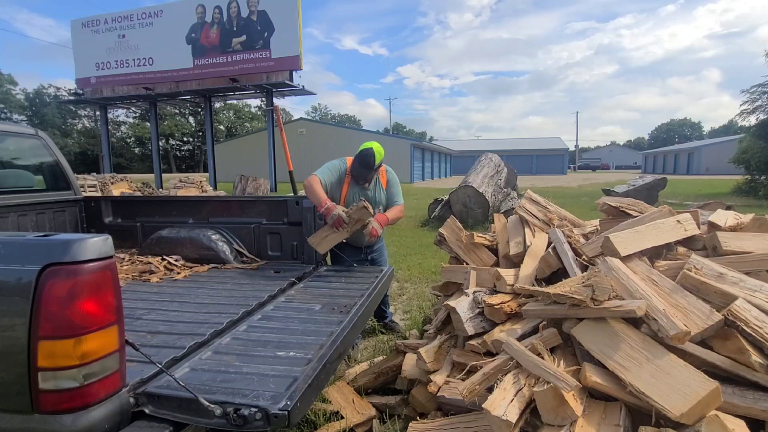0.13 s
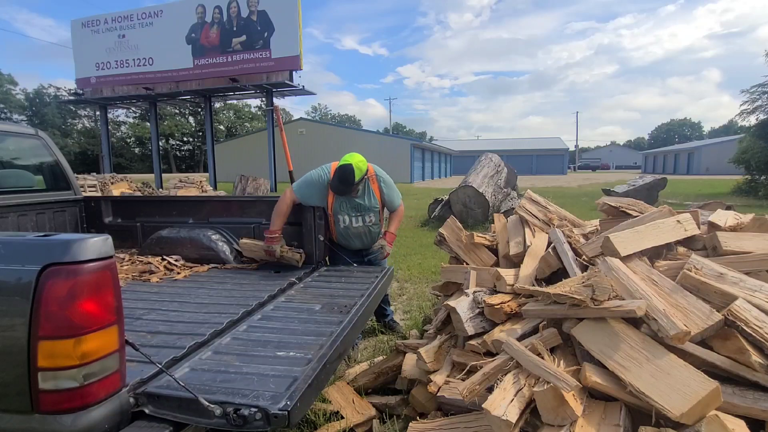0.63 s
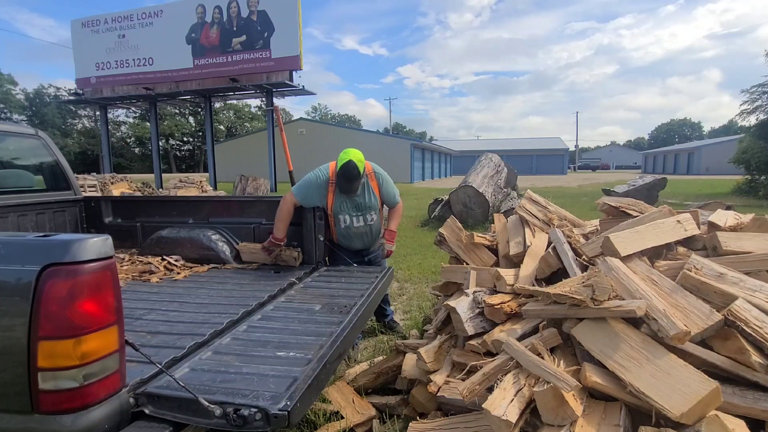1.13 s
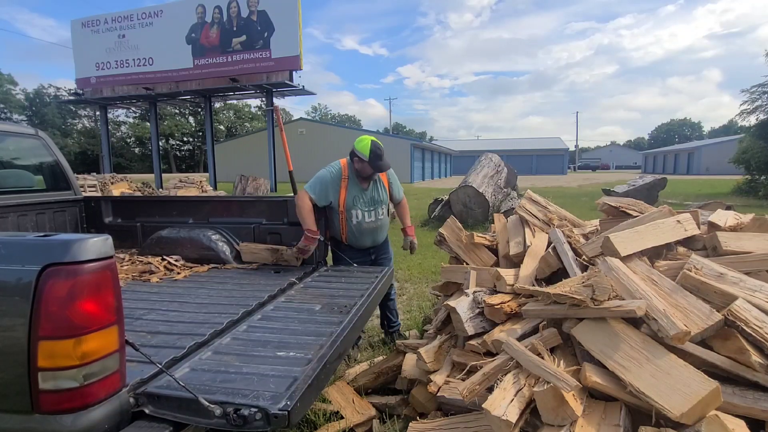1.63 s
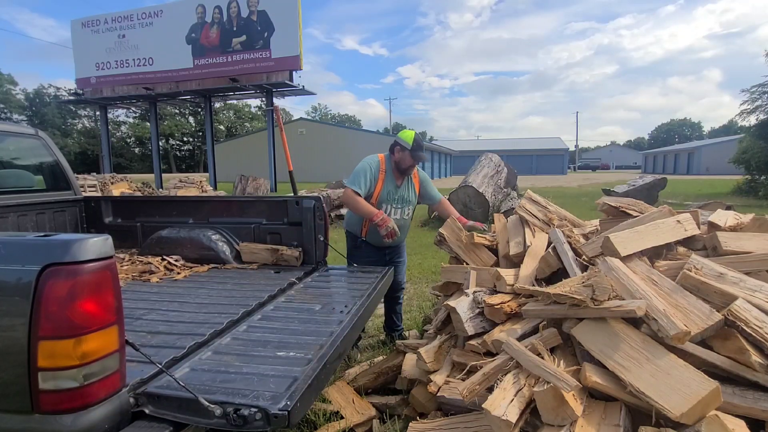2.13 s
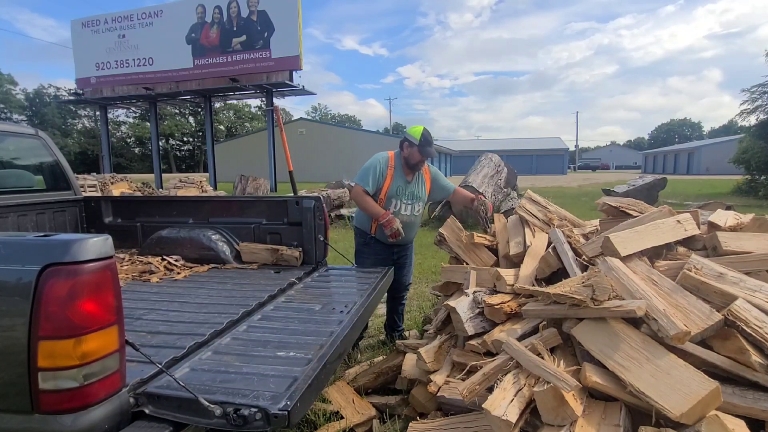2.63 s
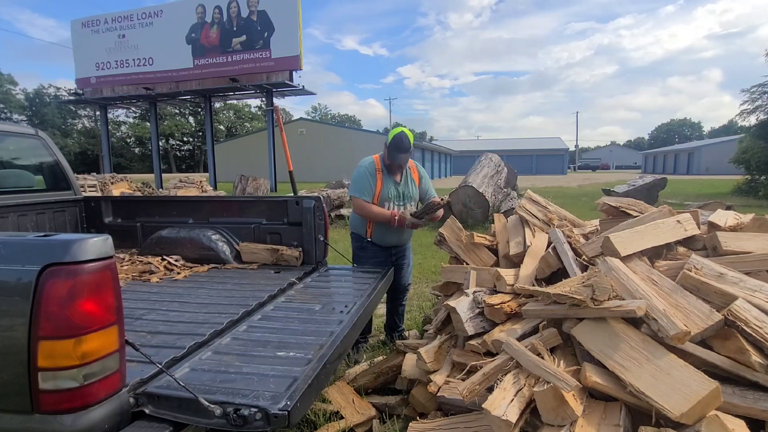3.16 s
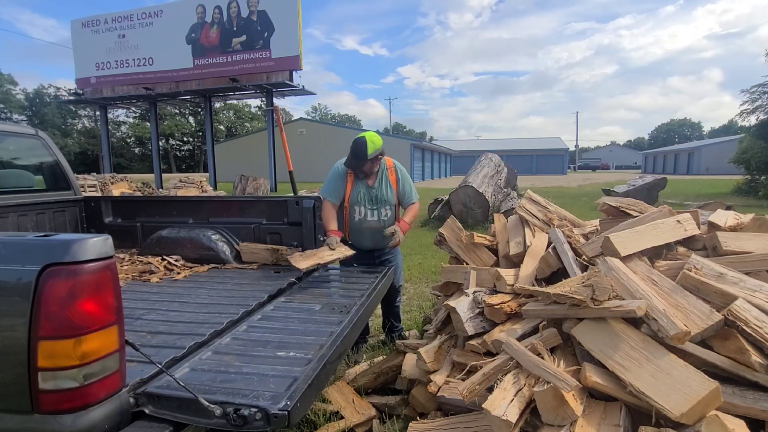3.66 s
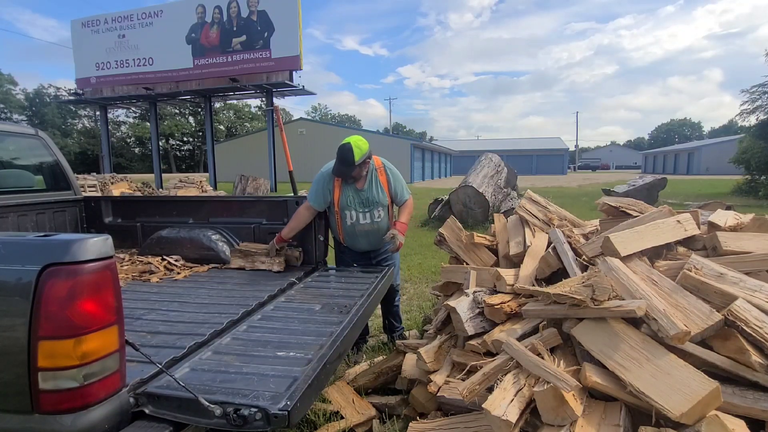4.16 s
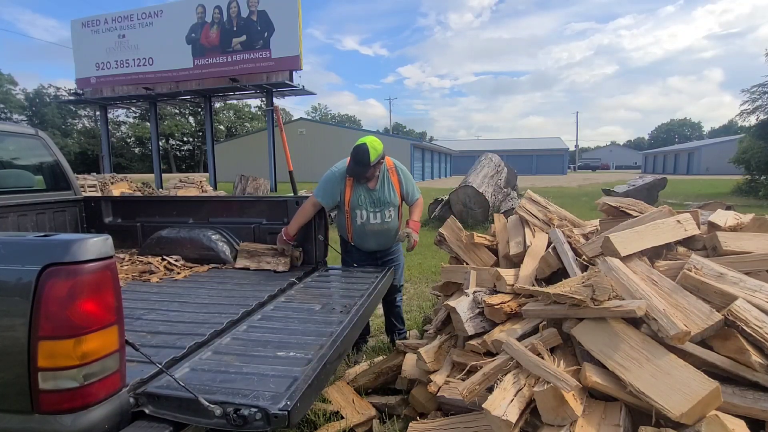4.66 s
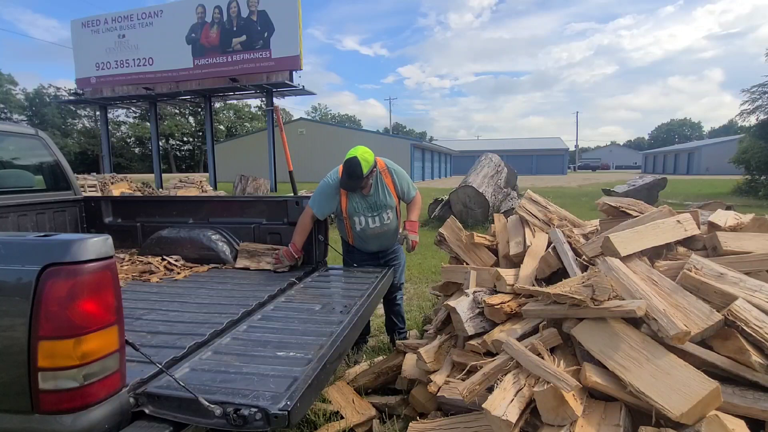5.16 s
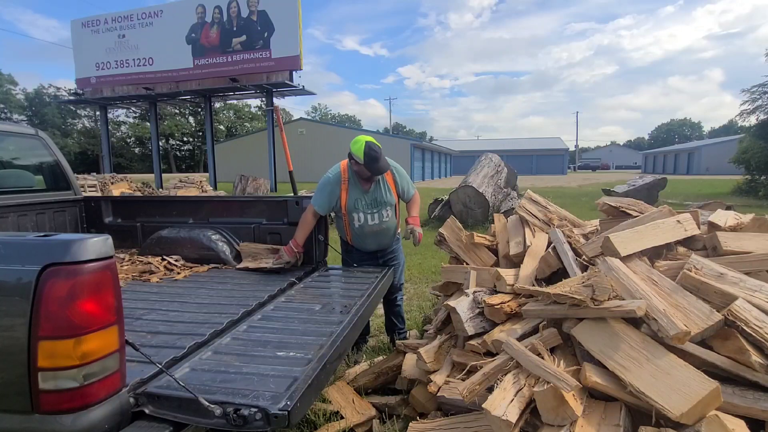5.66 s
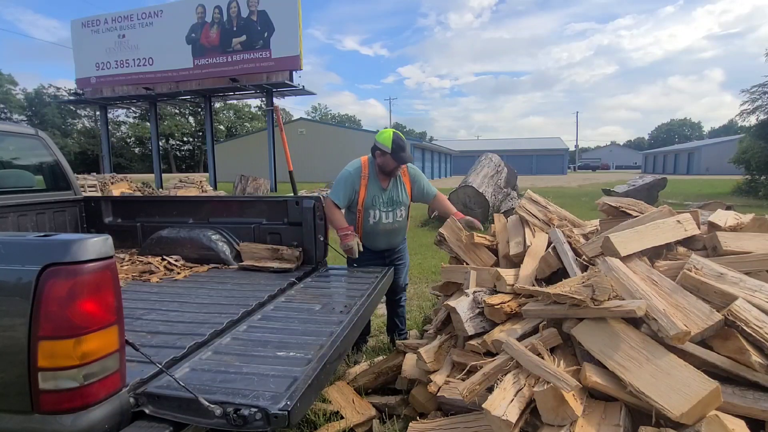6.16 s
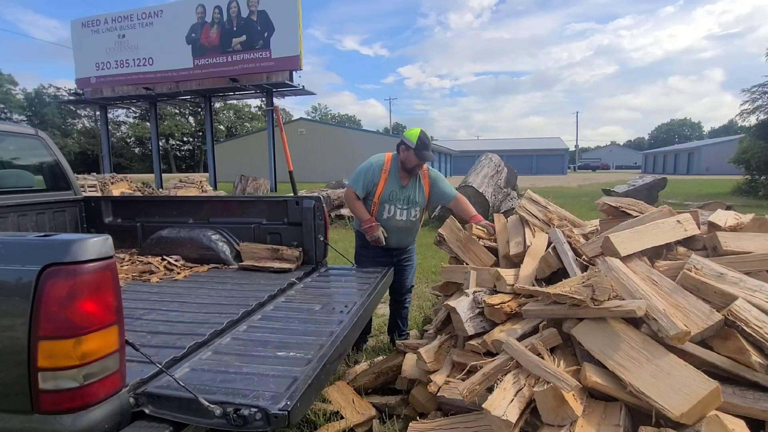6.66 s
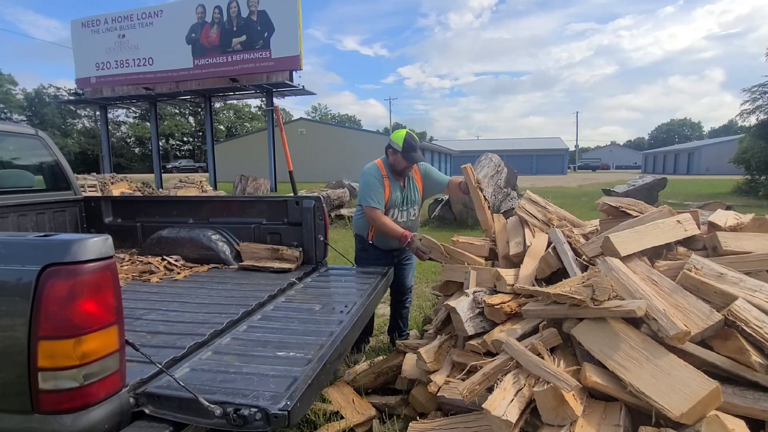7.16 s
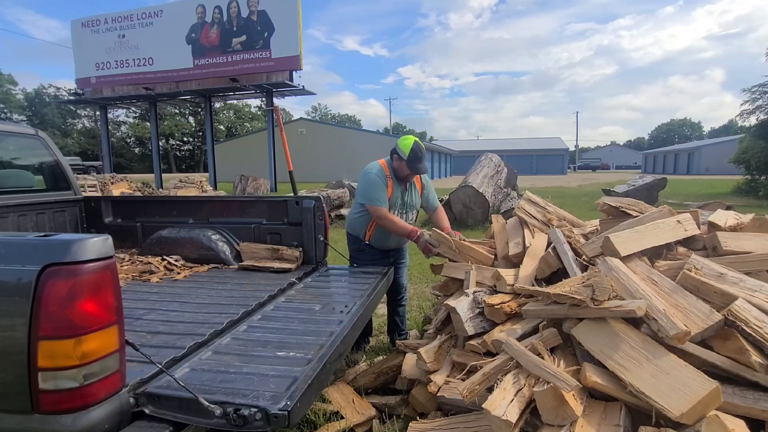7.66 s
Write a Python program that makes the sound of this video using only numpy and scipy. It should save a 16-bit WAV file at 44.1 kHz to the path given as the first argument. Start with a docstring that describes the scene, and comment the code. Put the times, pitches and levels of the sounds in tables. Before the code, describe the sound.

In an open yard, a stereo microphone close to a pickup catches low wind thumps, then a loud clattering drop of split firewood on the steel bed, booming briefly. Gloves rub on bark. A second sharp knock and a third tumbling one follow with pauses. Traffic rumbles and hisses steadily, a vehicle swelling on the left, while crickets chirp faintly. Near the end splinters crackle and logs clack together.

```python
"""Crickets chirp, far tyres hiss and an engine hums in an open woodyard; wind slaps come in the first half, gusts
early and again near the end. Split logs drop on the steel bed of a pickup from 0.8 s, rub under the hands, and
land again at 4.3 s and 5.9 s. On the left one vehicle passes at 1.2 s and another swells towards 7.3 s;
splinters crackle from 7 s and logs clack on logs at 7.7 s. Knocks are dying sines of log and bed with a noise
crack; snaps, rubbing, traffic and gusts are coloured noise; hum, slaps and crickets are gliding or wavering sines."""
import sys
import numpy as np
from scipy import signal
from scipy.fft import rfft, irfft
from scipy.io import wavfile
from scipy.ndimage import uniform_filter1d

SR = 44100
rng = np.random.default_rng(int(sys.argv[2]) if len(sys.argv) > 2 else 0)


def invert_db(level):
    """Linear amplitude ratio for a level in decibels (20 dB per decade), elementwise."""
    return 10 ** (np.asarray(level, dtype=float) / 20)


def int16_out(signal):
    """Quantize to a 16-bit WAV file."""
    q = np.round(np.clip(np.atleast_2d(signal).T, -1, 1) * 32767)
    wavfile.write(sys.argv[1], SR, q.astype(np.int16))


N = 343980

# spectrum of the noise where wood strikes: hz, gain_db
CRACK_COLOUR = [(300, -13.5), (700, 7), (1200, 11), (2000, 9.5), (3000, 11.5), (4500, -8.5), (7000, -12.5),
                (10000, -33.5), (15000, -43)]


def evened(x):
    """Scales to rms 1."""
    return x / np.sqrt(np.mean(x ** 2) + 1e-20)


def drift(count, span):
    """Slow random wander of rms 1: white noise averaged over span samples."""
    return evened(uniform_filter1d(rng.standard_normal(count), size=span))


def read(points, hz):
    """Reads a spectrum on a log-frequency axis."""
    f, value = np.transpose(points)
    return np.interp(np.log(hz + 1), np.log(f + 1), value)


def curve(rows, column=1):
    """Joins the rows of a table sample by sample; the first column is time in s."""
    columns = np.transpose(rows)
    return np.interp(np.arange(N) / SR, columns[0], columns[column])


def colour(x, points):
    """Filters along the last axis by a spectrum of (Hz, dB)."""
    size = x.shape[-1]
    gain = invert_db(read(points, np.fft.rfftfreq(size, 1 / SR)))
    return irfft(rfft(x) * gain, size)


def add(mix, s, sound):
    """Mixes a two-channel sound in at time s."""
    part = mix[:, max(round(s * SR), 0):][:, :sound.shape[1]]
    part += sound[:, :part.shape[1]]


def placed(x, lead, pan_db):
    """The left microphone hears it lead samples sooner and pan_db louder."""
    left = np.roll(x, -round(lead)) * invert_db(pan_db / 2)
    right = x / invert_db(pan_db / 2)
    return np.array([left, right])


def leftward(both):
    """The work goes on to the left: the right microphone hears it 7 samples later."""
    return np.array([both[0], np.r_[np.zeros(7), both[1, :-7]]])


def humps(s, db, rise, fade, fall_db, floor_db):
    """Gain curve of swells over a floor; each falls by fall_db within its rise before and its fade after the top."""
    t = np.arange(N) / SR
    power = invert_db(floor_db) ** 2
    for top_s, top_db, rise_s, fade_s in zip(s, db, rise, fade):
        away = np.where(t < top_s, (top_s - t) / rise_s, (t - top_s) / fade_s)
        power = power + invert_db(top_db - fall_db * away) ** 2
    return np.sqrt(power)


def hiss(points, same, lead, patchy_db, size):
    """Random short-time spectra with drifting patches; part of it is common to both microphones."""
    frames, hz = 4 * N // size + 5, np.fft.rfftfreq(size, 1 / SR)
    a, b, c, d, patches = rng.standard_normal((5, len(hz), frames))
    patches = uniform_filter1d(uniform_filter1d(patches, size=10, axis=0), size=10, axis=1)
    same = np.clip(same(hz), -1, 1)[:, None]
    late = np.exp(-2j * np.pi * hz * lead / SR)[:, None]  # the right channel lags by lead samples
    left = a + 1j * b
    right = same * late * left + np.sqrt(1 - same ** 2) * (c + 1j * d)
    spectra = np.array([left, right]) * invert_db(read(points, hz)[:, None] + patchy_db * evened(patches))
    return evened(signal.istft(spectra, nperseg=size, noverlap=3 * size // 4)[1][:, :N])


def steel():
    """All modes of the bed as dying sines: the strongest ones, then a scattered crowd."""
    # strongest modes of the steel bed: mode_hz, level_db, t60_s
    strongest = [(87.4, -18, .8), (110.1, -11.5, 0.85), (140.3, -17.5, 1.56), (188, -18, 0.35),
                 (242.4, -17, 0.53), (262.5, -18, 0.85), (326.8, -15, 0.24), (415, -18.5, 0.33),
                 (466, -14, 0.22), (600, -7.5, 0.12), (750, -22.5, 0.23)]
    # trend of the crowd of lesser modes: mode_hz, level_db, t60_s (each then scattered by 30 %)
    sheet = [(60, -27, 0.7), (103, -19.5, 0.82), (170, -25, 0.6), (255, -30.5, 0.81), (394, -21, 0.27),
             (600, -26.5, 0.34), (820, -29.5, 0.22), (1410, -28, 0.07)]
    t = np.arange(SR) / SR
    crowd_hz = 60 + 1440 * ((np.arange(140) + rng.random(140)) / 140) ** 1.6
    sheet_hz, sheet_db, sheet_t60 = np.transpose(sheet)
    crowd_t60 = np.interp(crowd_hz, sheet_hz, sheet_t60) * rng.uniform(.7, 1.3, len(crowd_hz))
    hz, db, t60 = np.transpose(strongest)
    hz = np.r_[hz, crowd_hz]
    db = np.r_[db, np.interp(crowd_hz, sheet_hz, sheet_db)]
    t60 = np.r_[t60, crowd_t60]
    return hz, invert_db(db[:, None] - 60 * t / t60[:, None]) * np.sin(2 * np.pi * hz[:, None] * t)


def knock(modes_hz, modes, level_db, log_hz, heave_db, hard_db):
    """The log rings briefly and the bed longer; each row stirs the modes of the bed differently."""
    t = np.arange(SR) / SR
    shared, *apart = rng.standard_normal((3, len(modes_hz)))
    shared = np.sign(shared) * np.clip(abs(shared), .6, 1.3)
    stir = shared + .3 * np.array(apart)  # the two microphones hear slightly different mixes of modes
    # heavy drops move the whole floor, hard ones reach the high modes
    heave = heave_db * (modes_hz < 156.3)
    reach = (hard_db + 11.5) * np.clip(np.log2(modes_hz / 350), 0, 1)
    bed = (stir * invert_db(heave + reach)) @ modes * (1 - np.exp(-t / .005))
    # the ring holds, then is stifled: decay goes with a power of time
    log = np.sin(2 * np.pi * log_hz * t) * invert_db(-60 * (t / 0.055) ** 1.46)
    log *= (1 - np.exp(-t / 0.0029)) ** 2  # the log settles onto the ribs
    grit = evened(colour(rng.standard_normal((2, len(t))), CRACK_COLOUR))
    clatter = invert_db(2.5 * drift(len(t), 150))  # bark bits rattle unevenly
    crack = (grit[0] + .5 * grit) * clatter
    crack *= invert_db(hard_db - 14.0 - 60 * t / 0.29) * (1 - np.exp(-t / 0.00046))
    return invert_db(level_db) * leftward(invert_db(1.5) * log / abs(log).max() + bed + crack)


def clack(level_db, log_hz, over_hz, over_db):
    """Wood on wood: two short rings and a crack, with no steel behind them."""
    t = np.arange(SR // 8) / SR
    rings = np.zeros(len(t))
    for hz, db in ((log_hz, 0), (over_hz, over_db)):
        t60_s = 0.048 / (hz / 400) ** 0.12  # higher rings die sooner
        rings += invert_db(db - 60 * t / t60_s) * np.sin(2 * np.pi * hz * t)
    grit = evened(colour(rng.standard_normal((2, len(t))), CRACK_COLOUR))
    crack = invert_db(-12.0 - 60 * t / 0.1) * (grit[0] + .5 * grit)
    return leftward(invert_db(level_db) * (rings + crack) * (1 - np.exp(-t / 0.00027)))


def tick(peak_db, body_db, sizzle_db):
    """A splinter, bark or grit snaps: a ragged burst of dry noise with a fainter, longer tail."""
    # plain spectrum of a snap: hz, gain_db
    snap_colour = [(1290, -42.5), (2200, -7.5), (2800, 14), (7090, -4.5), (8510, -12), (10800, -18.5),
                   (13200, -21), (15000, -23.5), (16000, -71.5)]
    t = np.arange(4096) / SR
    plain_sizzle_db = -17  # the sizzle at which a snap keeps its plain colour
    tilt = [(hz, db + body_db * (hz < 5000) + (sizzle_db - plain_sizzle_db) * (hz > 8500))
            for hz, db in snap_colour]
    shared, *apart = rng.standard_normal((3, len(t)))
    ragged = invert_db(1.1 * drift(len(t), 60))
    burst = evened(colour((shared + np.array(apart)) * ragged, tilt))
    fall = invert_db(-60 * t / 0.015) + invert_db(-8.5 - 60 * t / .13)
    burst *= fall * (1 - np.exp(-t / 0.00039))
    return leftward(invert_db(peak_db) * burst / abs(burst).max())


def rubbing():
    """Gloves and bark rub on wood: tiny grains coming in clumps, and crackles as bark fibres break."""
    # one row a stroke, at its hardest pressure: top_s, level_db, rise_s, fade_s (each over 14.6 dB)
    strokes = [(1.27, -55.5, 0.075, 0.069), (1.51, -54, 0.14, 0.097), (1.8, -55, 0.21, 0.1),
               (3.31, -57.5, 0.22, 0.44), (4.3, -53.5, 0.12, 0.64), (5.35, -62.5, 0.092, 0.14),
               (5.9, -60.5, 0.86, .26), (6.92, -49, .17, 0.33), (7.18, -45.5, 0.052, 0.062),
               (7.3, -48.5, 0.34, 0.14), (7.51, -43.5, 0.25, .3), (7.668, -39.5, 0.14, 0.46)]
    # spectrum of the rubbing: hz, gain_db
    rub_colour = [(1470, -3.5), (2500, 0), (2740, -2), (3300, -1.5), (4580, -10.5), (7020, -10),
                  (8940, -22), (13900, -26), (15000, -32.5), (16000, -34)]
    clumps = invert_db(3.0 * drift(N, 350))
    struck = rng.random((2, N)) < 1200 / SR  # 1200 grains a second
    grains = evened(invert_db(1.1 * np.minimum(rng.exponential(1, (2, N)), 4)) * struck)
    grains = grains * rng.choice([-1, 1], (2, N)) + .55 * rng.standard_normal((2, N))
    broken = rng.random(N) < 100 / SR  # 100 crackles a second
    breaks = invert_db(4.1 * np.minimum(rng.exponential(1, N), 3)) * broken
    dying = invert_db(-60 * np.arange(1000) / SR / 0.018)
    crackle = evened(signal.oaconvolve(breaks, dying)[:N] * rng.standard_normal(N))
    both = (grains + 0.073 * grains[::-1]) * clumps + invert_db(-9) * crackle
    # the floor stays up: the hands never rest entirely
    return evened(colour(both, rub_colour)) * humps(*np.transpose(strokes), fall_db=14.6, floor_db=-76.5)


def slap(hz, left_db, right_db):
    """An abrupt push of air on a microphone swings 2.33 cycles of its first pitch, slowing, and stops."""
    u = np.linspace(0, 1, round(2.33 / hz * SR))
    swing = np.sin(2 * np.pi * np.cumsum(hz * (1 - .25 * u)) / SR) * np.sin(np.pi * u ** 0.69)
    return swing * invert_db(np.array([[left_db], [right_db]])) * rng.choice([-1, 1], (2, 1))


def wind():
    """Gusts on the microphones: lumpy low pressure noise, unrelated at the two."""
    # gusts: top_s, left_db, right_db, length_s
    gusts = [(0.85, -30, -28, 0.41), (1.1, -50, -47, 0.44), (2.79, -75, -44, 0.59), (3.3, -58, -45.5, 0.4),
             (3.8, -66.5, -48.5, 2), (7.45, -43, -42.5, 0.3), (7.705, -46, -46, 0.18)]
    # spectrum of a gust: hz, gain_db
    gust_colour = [(15, -5), (40, 4.5), (70, 10), (110, 4), (160, -39), (300, -57.5), (500, -79.5)]
    lumps = hiss(gust_colour, lambda hz: 0 * hz, 0, patchy_db=3.0, size=4096)
    s, left, right, length = np.transpose(gusts)
    # a gust climbs its last 18 dB in 0.45 of its length, and sinks as far in a whole length
    return lumps * [humps(s, db, 0.45 * length, length, fall_db=18, floor_db=-64) for db in (left, right)]


def traffic():
    """A far wash of tyres, and vehicles on the left (one passes, another swells), as patchy noise."""
    # spectrum of the far road: hz, gain_db
    far_colour = [(15, -78), (25, -37), (64, 1.5), (157, -16.5), (180, -11.5), (301, -20.5), (545, -18),
                  (770, -6), (950, -12), (1100, -8.5), (1300, -7.5), (1560, -12), (2800, -23.5),
                  (4250, -34.5), (4870, -38.5), (6500, -33.5), (7200, -26), (7900, -38), (8830, -48.5),
                  (13600, -52), (16000, -69)]
    # likeness of the far road at the two microphones: hz, likeness (1 is identical)
    far_same = [(60, 1), (180, 0.97), (550, 0.87), (1650, 0.11), (4970, 0.024), (15000, 0.01)]
    # level of the far road: time_s, level_db
    far_level = [(0, -47), (2.5, -46.5), (5, -46.5), (7.8, -44.5)]
    # spectrum of the tyres of the vehicles on the left: hz, gain_db
    near_colour = [(24, -54), (40, -26.5), (70, 3.5), (156, -18), (178, -15.5), (554, -11), (635, -14),
                   (727, -7.5), (955, -13.5), (1170, -4.5), (4460, -32), (7010, -53), (9000, -60.5),
                   (11700, -98), (19800, -120)]
    # level of these vehicles, one passing at 1.2 s, another swelling towards 7.3 s: time_s, level_db
    near_level = [(0, -70.5), (1.2, -44), (1.6, -51), (2.5, -52.5), (3.5, -49.5), (4.5, -44.5), (5.5, -43),
                  (6.2, -40.5), (6.8, -38.5), (7.3, -37.5), (7.8, -38.5)]
    far = hiss(far_colour, lambda hz: read(far_same, hz), -1.5, patchy_db=1.76, size=2048)
    near = hiss(near_colour, lambda hz: .9 - 0.07 * np.log2(1 + hz / 300), 5.9, patchy_db=3.5, size=2048)
    return far * invert_db(curve(far_level)) + near * invert_db(curve(near_level))


def engine():
    """Low firing orders as sines that waver in pitch and level."""
    # engine orders, one table a tone: time_s, pitch_hz, level_db (rms)
    orders = [
        [(0.0, 73.2, -45.5), (0.59, 75, -55), (7.71, 74.25, -51.5), (7.8, 71.4, -46)],
        [(1.8, 150.6, -57.5), (4.24, 152.6, -52.5), (7.8, 151.8, -53)],
        [(2.2, 110, -51), (3, 112, -58), (5.6, 115, -59), (6.5, 117, -64), (7, 118, -49.5), (7.8, 118, -46.5)],
    ]
    out = np.zeros(N)
    for rows in orders:
        pitch_waver, level_waver = evened(uniform_filter1d(rng.standard_normal((2, N)), size=6000))
        start_s = rows[0][0]
        # a tone there from the start is on at once; others fade in over 0.43 s
        on = np.clip((np.arange(N) / SR - start_s) / 0.43 + (start_s < .1), 0, 1)
        turns = np.cumsum(curve(rows) + 1.09 * pitch_waver) / SR
        level = np.sqrt(2) * invert_db(curve(rows, column=2) + 0.48 * level_waver)
        out += on * level * np.sin(2 * np.pi * turns)
    return placed(out, 0, pan_db=0.2)


def chirp(hz, gap_s, grow_db):
    """Three wing strokes, each a falling whistle higher and mostly louder than the last, trailing off in the grass."""
    u = np.linspace(0, 1, round(.022 * SR))
    out = np.zeros(SR // 6)
    for k in range(3):
        pitch = hz - 70 * (2 - k) ** 1.5 - 560 * u ** 1.9
        stroke = np.sin(np.pi * u) * np.sin(2 * np.pi * np.cumsum(pitch) / SR)
        level = invert_db(grow_db * (k - 0.5) + 0.47 * rng.standard_normal())
        out[round(k * gap_s * SR):][:len(u)] = level * stroke
    t = np.arange(SR // 5) / SR
    trail = invert_db(-37 - 60 * t / .5) * rng.standard_normal(len(t))
    trail[0] = 1  # the direct sound
    return signal.fftconvolve(out, trail)


def crickets():
    """One steady caller ahead and a higher one to the right, three strokes a chirp."""
    # cricket ahead: last_stroke_s, level_db (before the growth from stroke to stroke)
    ahead = [(.058, -62), (.587, -62), (1.085, -61), (1.61, -64), (2.126, -64), (2.67, -66), (3.175, -65),
             (3.636, -63), (4.141, -61), (4.713, -61), (5.249, -64), (5.8, -68), (6.391, -62), (6.89, -64)]
    # higher cricket to the right: last_stroke_s, level_db (likewise)
    to_right = [(3.455, -74), (3.628, -79), (3.856, -72), (5.904, -62), (6.654, -60.5), (7.376, -63)]
    out = np.zeros((2, N + SR))  # a second of lead-in, cut off at the end
    # each chirp begins early enough for its last stroke to top out at the given time
    for s, db in ahead:
        add(out, 1 + s - .102, placed(invert_db(db) * chirp(5140, .0455, grow_db=3.5), 0, 0))
    for s, db in to_right:
        add(out, 1 + s - .093, placed(invert_db(db) * chirp(5400, .041, grow_db=7), 0, pan_db=-10))
    return out[:, SR:]


def chorus():
    """Far crickets blur into a narrow whistle of noise, throbbing 24 times a second."""
    band = colour(rng.standard_normal((2, N)), [(4550, -50), (4780, 0), (4900, 0), (5100, -50)])
    t = np.arange(N) / SR
    calls = invert_db(2.3 * drift(N, 5000))
    return invert_db(-81) * evened(band * calls * (1 + .35 * np.sin(2 * np.pi * 24 * t)))


def scene():
    """Wood on steel over the sounds of the yard."""
    # blows on the bed and further log rings within them:
    # start_s, level_db, log_ring_hz, heave_db (gain of the lowest modes), hardness_db
    knocks = [(.836, -10, 273, -6.5, -15.5), (.844, -14, 402.5, -14, -9), (.859, -10.5, 188, -2.5, -9.5),
              (.875, -11.5, 95, -14, -12.5), (.92, -14.5, 243, -1.5, -25), (0.956, -24.5, 186, -14, -21),
              (.986, -25, 143, -28, -14), (1.409, -39.5, 153, 12.5, -7), (4.284, -8, 240, -14, -16.5),
              (4.309, -20, 331, -25, -18), (4.338, -31.5, 740, -9, -3), (4.365, -33, 262, -25, -23),
              (4.455, -30, 270, -25, -16), (4.519, -33, 254, -25, -10), (5.347, -41, 240, -19, 5),
              (5.499, -38, 192, -23, -8), (5.904, -11.5, 217, -16, -17.5), (5.911, -17, 462, -18, -10),
              (5.952, -35, 260, -17, -19), (5.998, -23, 455, -21, -5.5), (6.007, -12.5, 246, -32, -23),
              (6.069, -26.5, 600, -24, 0.5), (6.096, -27, 455, -24, -21), (6.079, -32, 267, -17, -21),
              (6.165, -35, 280, -25, -10), (6.201, -37, 260, -23, -15)]
    # logs against logs: start_s, level_db, ring_hz, overtone_hz, overtone_db (over the ring)
    clacks = [(4.278, -26, 2140, 6050, -5), (4.289, -31, 1900, 2790, 10), (7.7143, -23.5, 367, 700, -6),
              (7.7193, -23, 610, 2030, 1), (7.724, -18.5, 1124, 1350, -24)]
    # slaps of wind on one microphone or both: start_s, starting_pitch_hz, left_peak_db, right_peak_db
    slaps = [(.085, 74.6, -48, -28), (.458, 85, -27.5, -49), (0.468, 100, -45, -28.5),
             (0.489, 54.6, -41, -28), (.512, 55, -31, -45), (0.777, 84, -32, -20.5), (3.175, 75, -46, -32),
             (3.253, 141, -55, -32), (3.277, 120, -55, -38), (3.3, 150, -55, -32.5), (3.321, 111, -55, -32),
             (3.352, 70, -55, -36.5)]
    # splinters, bark and grit: start_s, peak_db, body_db (gain under 5 kHz), sizzle_db (over 8.5 kHz)
    ticks = [(0.8583, -23.5, -3.5, -11.5), (.9517, -40, -19, -12), (1.2231, -45.5, -32, -21),
             (1.8, -44, -21, -17), (1.868, -28, -12, -16), (1.9015, -35, -10, -16), (3.325, -42, -49, -35),
             (4.226, -35.5, -10, -19), (4.2789, -23.5, -10, -15), (5.4798, -44, -12, -20),
             (5.644, -38.5, -18, -17), (5.8563, -45, -17, -14), (5.903, -32, 2, -12),
             (5.9419, -38, -30, -21), (6.0058, -35.5, -44, -28), (6.9265, -45, -15, -8),
             (7.0822, -53, -18, -2), (7.1745, -40, -3, -5), (7.198, -36, -4, -4), (7.239, -37.5, -12, -9),
             (7.296, -42, 0, -12), (7.3921, -33, 5, -5), (7.4067, -20, 2.5, -5), (7.4794, -40, -1, -19),
             (7.5157, -44, -15, -3), (7.5486, -48, -15, -1), (7.593, -42, -13, -5), (7.659, -27, 5, -5),
             (7.7197, -28, -20, -16)]
    mix = rubbing() + wind() + traffic() + engine() + crickets() + chorus()
    bed = steel()
    for s, *blow in knocks:
        add(mix, s, knock(*bed, *blow))
    for s, *blow in clacks:
        add(mix, s, clack(*blow))
    for s, *push in slaps:
        add(mix, s, slap(*push))
    for s, *snap in ticks:
        add(mix, s, tick(*snap))
    return mix


def top_cut(x):
    """Nothing passes above the cut-off."""
    return signal.sosfilt(signal.butter(12, 16460, fs=SR, output="sos"), x)


def record(dry):
    """The two microphones differ a little in colour; the treble of the whole is then shaped."""
    # left microphone over right: hz, difference_db
    ports = [(30, -3), (70, 0.5), (130, -1.5), (1000, 0.8), (5000, -2), (7000, 4.5), (10000, -1),
             (14000, -2)]
    # overall treble colour, a dip near 9 kHz and a cut above 15 kHz: hz, gain_db
    treble = [(8100, -0.5), (8800, -7.5), (9500, 2), (10200, 0), (15200, 9), (15900, -22)]
    left = colour(dry[0], [(hz, db / 2) for hz, db in ports])
    right = colour(dry[1], [(hz, -db / 2) for hz, db in ports])
    return top_cut(colour(np.array([left, right]), treble))


dry = scene()
out = record(dry)
int16_out(out)
```